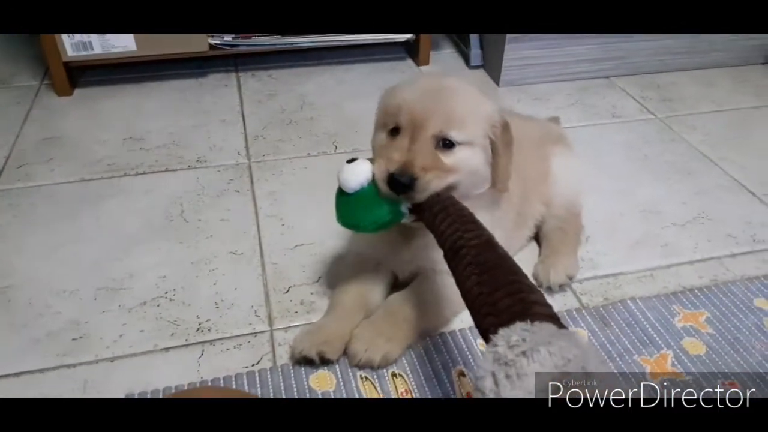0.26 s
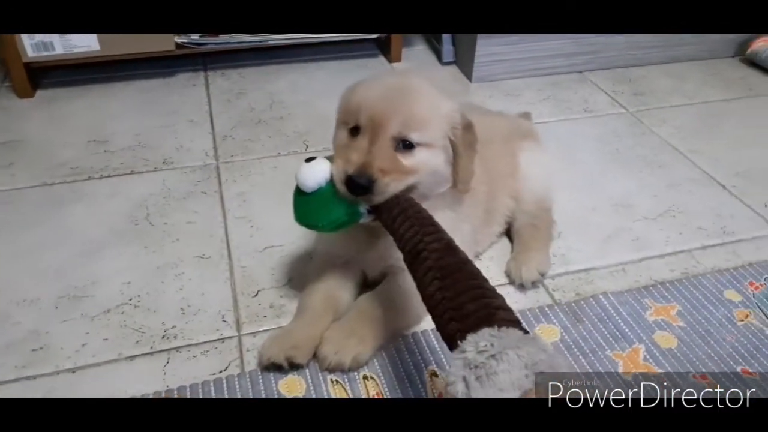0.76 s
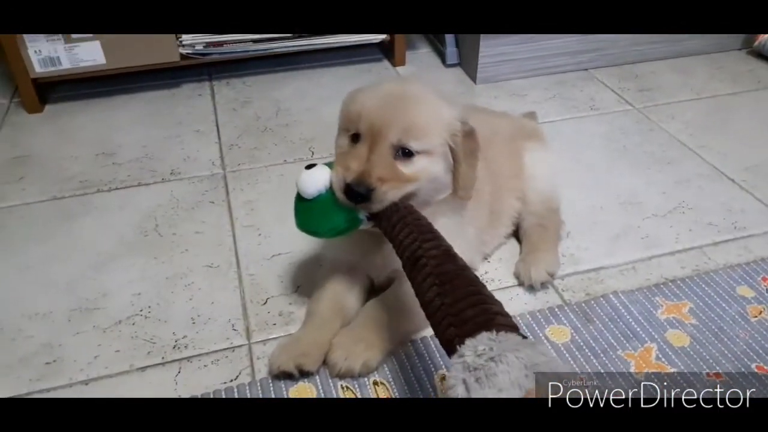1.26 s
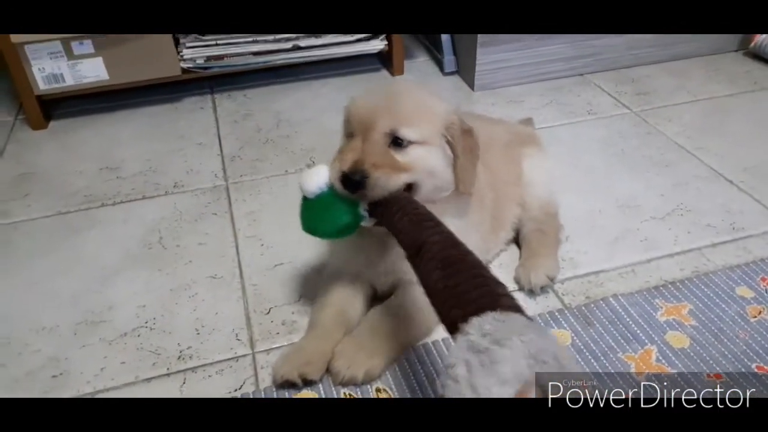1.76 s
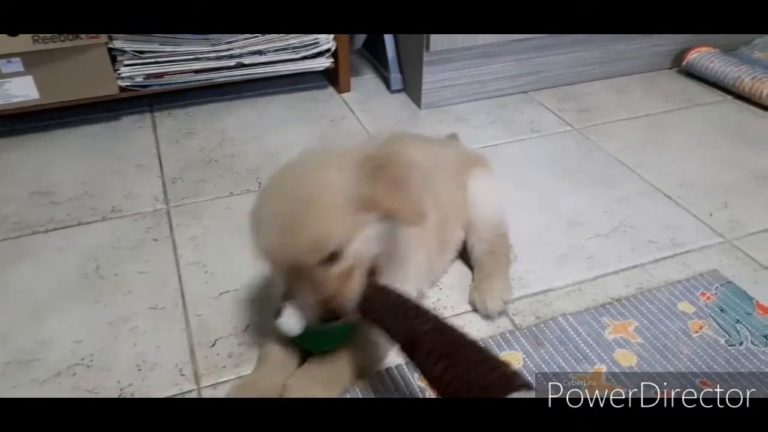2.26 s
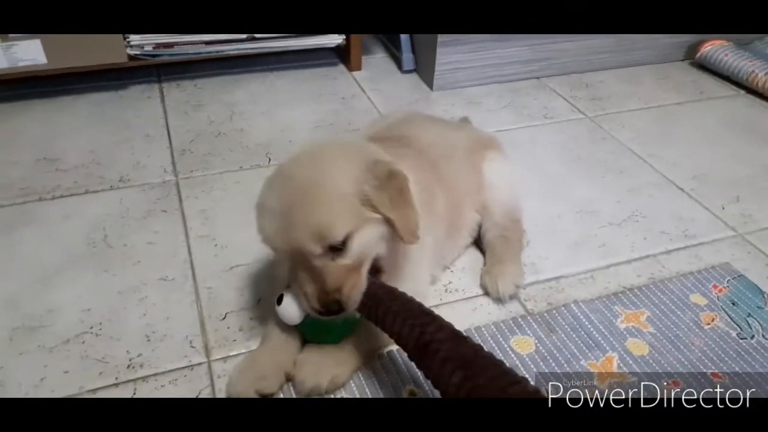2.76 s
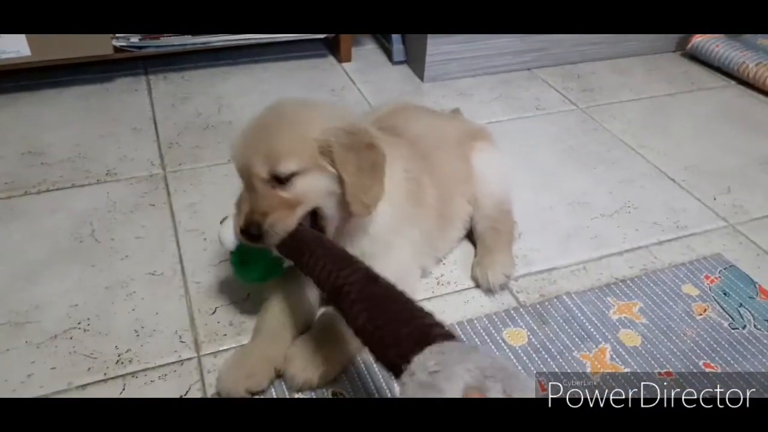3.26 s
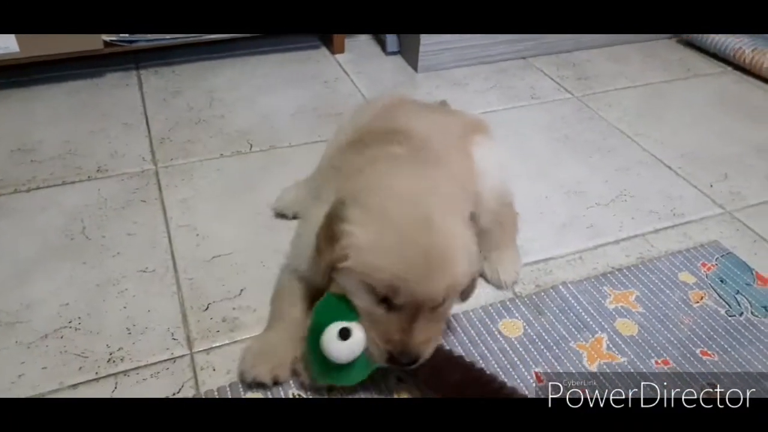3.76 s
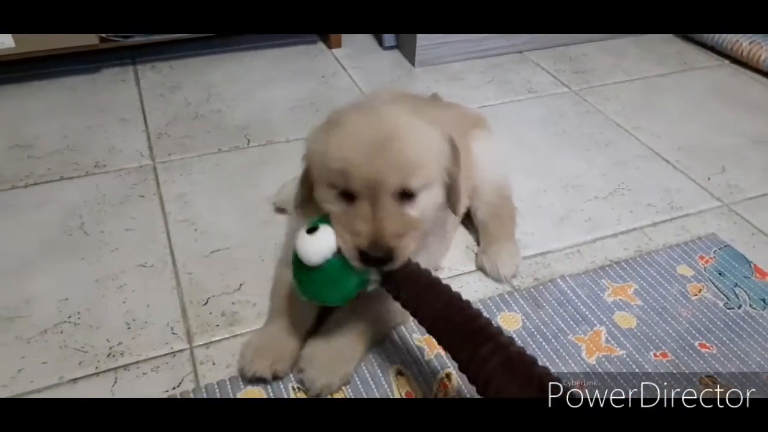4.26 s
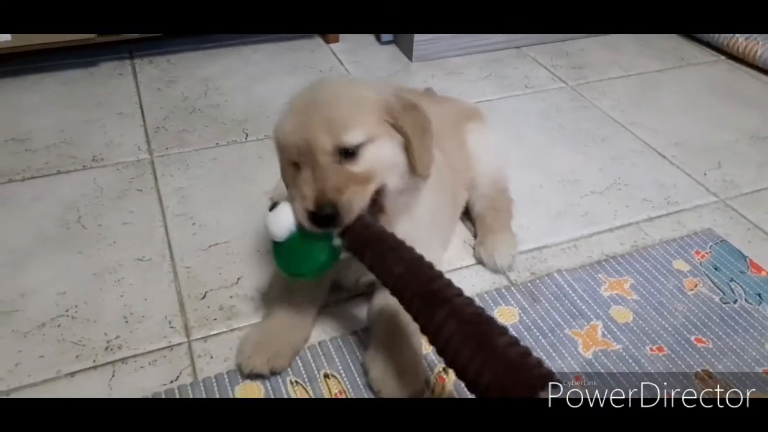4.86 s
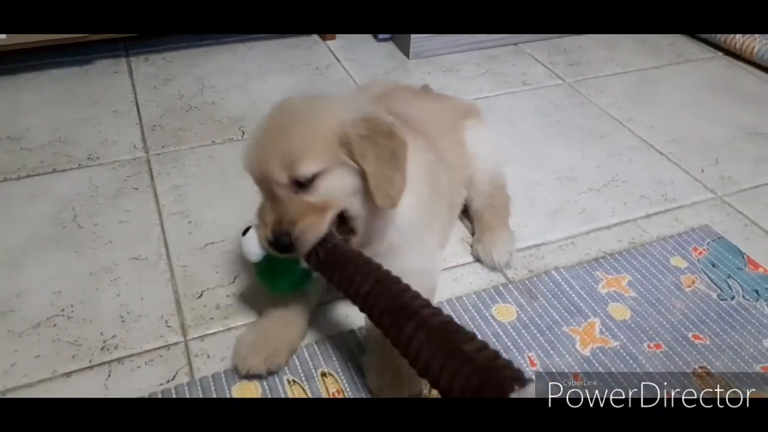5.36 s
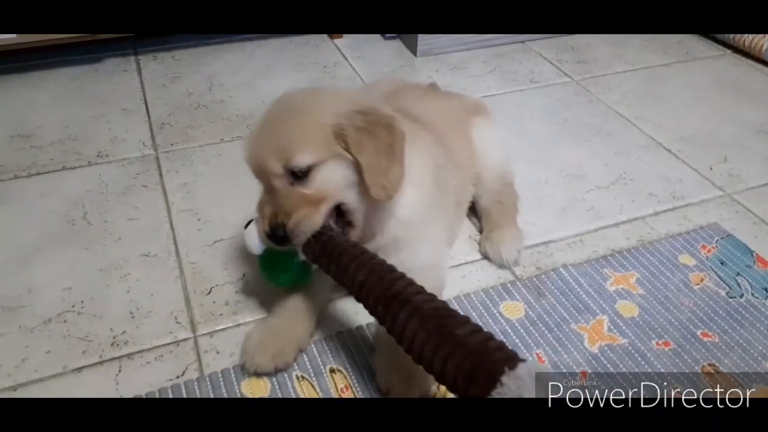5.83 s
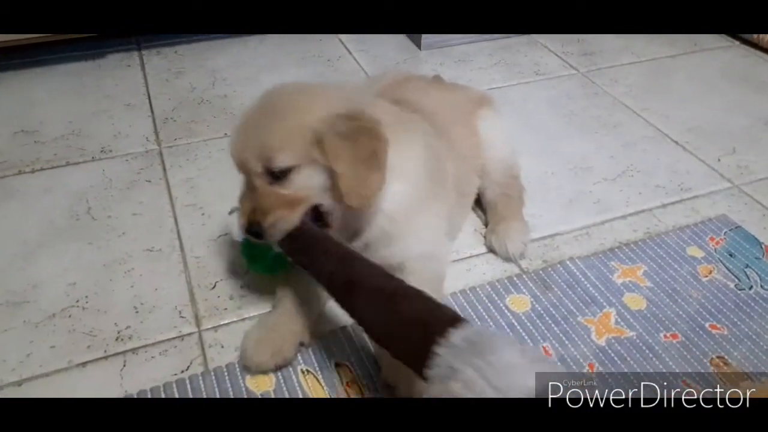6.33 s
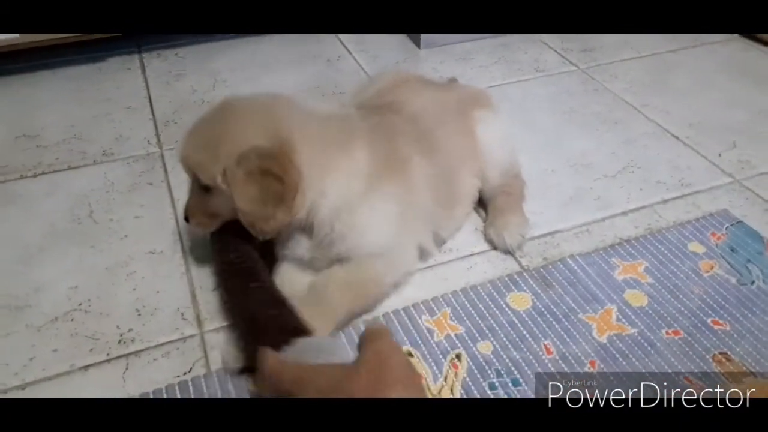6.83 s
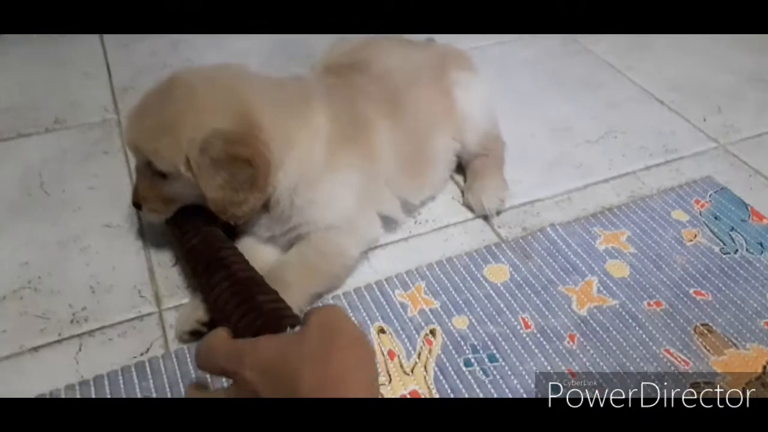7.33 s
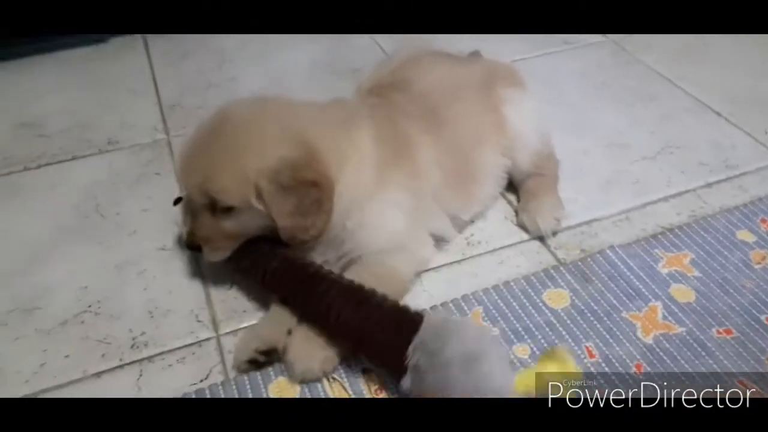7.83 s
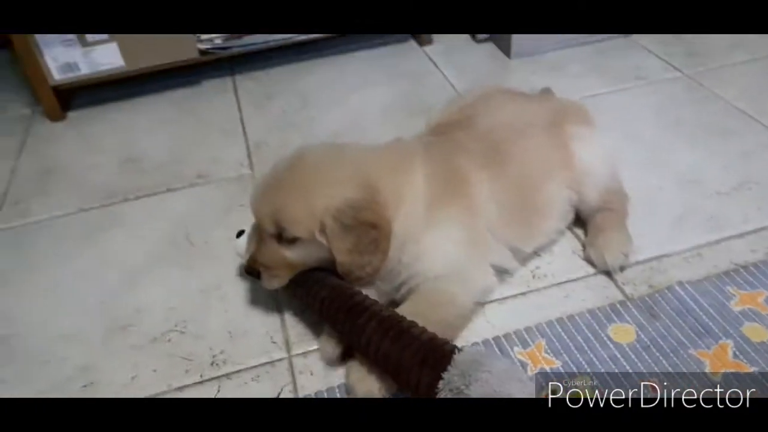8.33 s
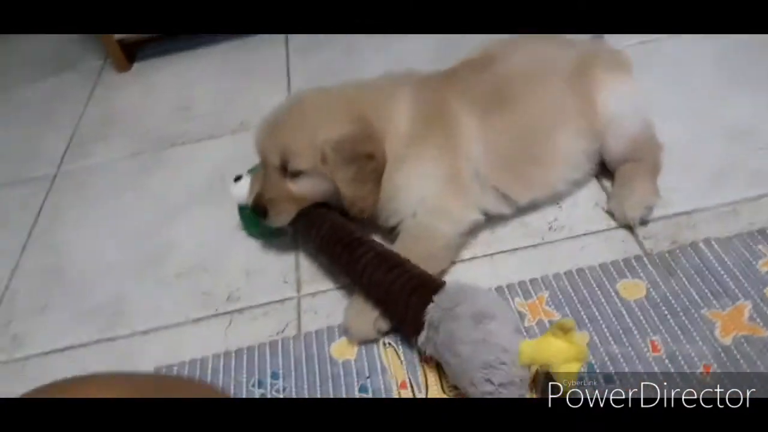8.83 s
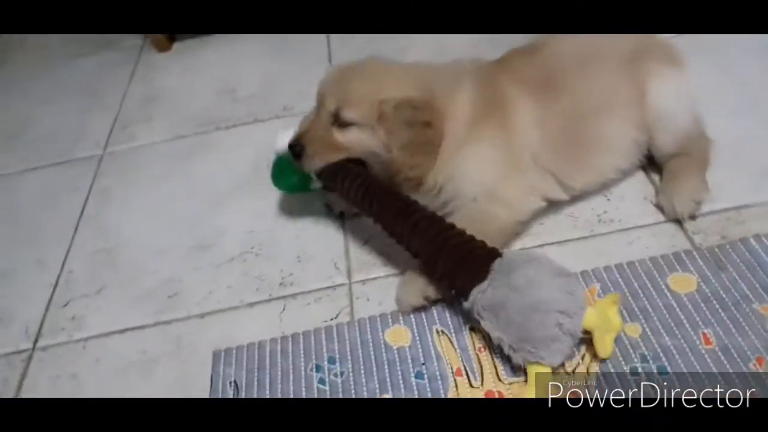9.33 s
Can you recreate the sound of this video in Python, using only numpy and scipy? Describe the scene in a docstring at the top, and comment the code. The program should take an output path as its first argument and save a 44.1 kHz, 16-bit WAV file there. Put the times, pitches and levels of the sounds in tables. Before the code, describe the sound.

Close to the microphone in a hard tiled room, a puppy bites a plush squeaky toy. Each bite makes a very short, bright arched squeak, followed by a quieter, lower, raspy squawk as it refills. Four quick pairs come first, then a gap with soft floor knocks, then five slower pairs. After that, only a steady low motor hum with fan air, fabric scuffs and a late dull thump remain.

```python
"""First the hum and air of appliances, with the room's tail of a squawk, heard close by on a tiled floor.
A puppy chews a plush toy beside a phone's two microphone ports. Each bite blows air out through the
squeaker's reed (a bright arched squeak); as the jaw lets go the bulb refills (a lower, raspy squawk).
Reeds are summed harmonics plus air noise in a short room; motors are beating tones, the fan is shaped
noise, plush is swelling noise, and soft knocks on the floor are fading low sines."""
import sys
import numpy as np
from scipy import signal
from scipy.fft import rfft, irfft, next_fast_len
from scipy.io import wavfile
from scipy.ndimage import map_coordinates

SR = 44100
rng = np.random.default_rng(int(sys.argv[2]) if len(sys.argv) > 2 else 0)


def store_pcm(level_fs):
    """Save levels as 16-bit WAV."""
    pcm = np.round(np.clip(level_fs, -1, 1) * 32767).astype(np.int16)
    wavfile.write(sys.argv[1], SR, np.atleast_2d(pcm).T)


N = 422919


def amp(db):
    """Decibels to gain."""
    return 10 ** (np.asarray(db) / 20)


def unit(x):
    """Scale to rms 1."""
    return x / np.sqrt(np.mean(x ** 2) + 1e-20)


def along(points, hz):
    """Read a curve of (f/Hz, value) points on a log frequency axis."""
    f, v = np.transpose(points)
    return np.interp(np.log(hz + 1), np.log(f + 1), v)


def curve(rows):
    """Turn (t/s, value) rows into one value per sample."""
    return np.interp(np.arange(N) / SR, *np.transpose(rows))


def wobble(rate, size):
    """A smooth random curve through rate knots a second."""
    knots = rng.standard_normal(size + 4)
    return map_coordinates(knots, [np.arange(size) * min(rate / SR, 1)])


def filtered(x, response):
    """Shape a sound's spectrum by a response of frequency."""
    n = x.shape[-1]
    m = next_fast_len(n + 8192)
    spectrum = rfft(x, m) * response(np.fft.rfftfreq(m, 1 / SR))
    return irfft(spectrum, m)[..., :n]


def add(track, s, sound):
    """Mix a sound in at time s, dropping what falls outside the track."""
    start = round(s * SR)
    part = sound[..., max(-start, 0):N - start]
    first = max(start, 0)
    track[..., first:first + part.shape[-1]] += part


def rush(colour):
    """Stereo noise of rms 1, alike at both ports in the bass and unrelated in the treble."""
    # likeness of the two ports: f/Hz, left-right correlation
    port_likeness = [(60, 0.95), (150, 0.9), (380, 0.56), (950, 0.087), (2380, -0.12), (5980, 0.036),
                     (15000, -0.012)]

    def mid_and_side(hz):
        turn = np.arccos(np.clip(along(port_likeness, hz), -1, 1)) / 2
        return colour(hz) * np.array([np.cos(turn), np.sin(turn)])

    mid, side = filtered(rng.standard_normal((2, N)), mid_and_side)
    return unit(np.array([mid + side, mid - side]))


def lines(hz, orders, drift):
    """A steady machine tone with overtones and a slightly wandering phase (drift in radians)."""
    phase = 2 * np.pi * hz * np.arange(N) / SR + drift * wobble(1.405, N)
    return sum(amp(db) * np.sin(round(k) * phase) for k, db in orders)


def appliances():
    """Two motors a few Hz apart beat over mains hum and fan noise that rings in a cabinet; all swell together."""
    # overtones of each motor, relative levels: multiple of the base tone, level/dB
    motor_overtones = [(1, -39.5), (2, -57), (3, -59), (4, -65)]
    second_overtones = [(1, -48), (2, -66), (3, -64)]
    # overtones of the mains hum: multiple of the base tone, mean level/dB
    mains_overtones = [(1, -48), (2, -57.5), (3, -58), (4, -58), (7, -68.5)]
    # rise and fall of the hum, used about its mean: t/s, level/dB
    hum_level = [(0, -41), (0.4, -38), (1.7, -41), (2.8, -40), (3.35, -38), (4.6, -39), (5.1, -40.5),
                 (7.3, -40), (7.6, -37.5), (8.3, -37.5), (8.8, -36.5), (9.59, -36.5)]
    # colour of the fan's air, relative: f/Hz, level/dB per Hz
    fan_colour = [(20, -56), (30, -39), (48, -22.5), (70, -19), (130, -14), (170, -18.5), (260, -8.5),
                  (400, -10.5), (600, -15), (1300, -18), (2300, -19), (4000, -33.5), (9000, -36),
                  (10500, -40.5), (15500, -42)]
    # cabinet resonances, relative: f/Hz, width/Hz, level/dB
    resonances = [(341, 50, 17), (274, 8.3, -11)]
    motor_hz, second_motor_hz, mains_hz = 287.8, 294.1, 100.05
    motor_db, fan_db, cabinet_db = -41.5, -43.5, -48  # ahead of the swell and the stereo lean
    fan_follows, mains_follows = 0.6, 0.52  # share of the motors' swell in dB

    level_db = curve(hum_level)
    swell_db = level_db - np.mean(level_db)
    motors = lines(motor_hz, motor_overtones, drift=.1)
    motors = motors + lines(second_motor_hz, second_overtones, drift=.15)
    mains = lines(mains_hz, mains_overtones, drift=0.058)
    hum = amp(motor_db + swell_db) * unit(motors) + amp(mains_follows * swell_db) * mains

    def ringing(f):
        return sum(amp(db) / (1 + (2 * (f - hz) / width) ** 2) for hz, width, db in resonances)

    air = rush(lambda f: amp(along(fan_colour, f)))
    cabinet = rush(ringing)
    fan = amp(fan_follows * swell_db) * (amp(fan_db) * air + amp(cabinet_db) * cabinet)
    return (hum + fan) * amp([[-1.25], [1.25]])  # stronger at the right port


def plush():
    """Chewed fabric scuffs throughout; each tug over tile and mat swells and fades, with a bright swish."""
    # tugs: t/s at the fastest, time/s from there down to 1/e, scuff level/dB, swish level/dB
    tugs = [(3.4, 0.29, -55, -63), (4.5, .4, -61, -70), (7.52, 0.12, -60, -78), (8.128, 0.23, -59, -61),
            (8.42, 0.034, -52.5, -55), (8.532, .06, -59, -63), (8.74, .03, -56, -63),
            (8.91, 0.16, -50, -57.5), (9.188, 0.11, -47, -46.5), (9.54, .06, -58, -64)]
    # colour of scuffing, relative: f/Hz, level/dB per Hz
    scuff_colour = [(300, -14), (900, -23), (2200, 5.5), (3500, -2.5), (6000, -19.5), (9000, -27),
                    (12500, -8.5), (15000, -32)]
    # colour of fast sliding, relative: f/Hz, level/dB per Hz
    swish_colour = [(1000, -19), (3500, 9), (6000, 9.5), (9000, 5), (15000, -22)]
    chew_db = -68  # steady rustle, ahead of the catches
    tug_shape = 1.5  # 1 is a pointed swell, 2 a rounded one

    t = np.arange(N) / SR
    rub, slide = np.full(N, amp(chew_db)), np.zeros(N)
    for s, width, scuff_db, swish_db in tugs:
        speed = np.exp(-np.abs((t - s) / width) ** tug_shape)
        rub = rub + amp(scuff_db) * speed
        slide = slide + amp(swish_db) * speed
    catches = wobble(14, N) + wobble(70, N)  # the pile catches and lets go
    scuff = rub * amp(2.2 * catches) * rush(lambda f: amp(along(scuff_colour, f)))
    swish = slide * amp(0.54 * catches) * rush(lambda f: amp(along(swish_colour, f)))
    return (scuff + swish) * amp([[-1], [1]])  # stronger at the right port


def arch(u, first, top, last, crest, climb, sag):
    """Pitch follows the air pressure: it climbs, holds, then sags; higher powers flatten the top."""
    crest = np.clip(crest, .1, .9)
    before = np.clip(1 - u / crest, 0, 1)
    after = np.clip((u - crest) / (1 - crest), 0, 1)
    return top + (first - top) * before ** climb + (last - top) * after ** sag


def reed(pitch, colour, fundamental_db, tilt_db, mouth_hz, mouth_db, flutter, shimmer_db):
    """Harmonics of a beating reed; flutter unsettles its period from cycle to cycle."""
    n = len(pitch)
    k = np.arange(1, 17)[:, None]
    phase = 2 * np.pi * np.cumsum(pitch * (1 + flutter * wobble(1114, n))) / SR
    db = colour(k * pitch) + tilt_db * np.log2(k) + (k == 1) * fundamental_db
    octaves_off = np.log2(k * pitch / mouth_hz)
    db = db + mouth_db * np.exp(-(octaves_off / 0.17) ** 2)  # the mouth lifts or shades one band
    db = db + shimmer_db * np.array([wobble(73, n) for _ in k])  # jaw and plush shade the opening
    shift = rng.normal(0, 1, k.shape)  # the pipe delays each overtone differently
    audible = k * pitch < SR / 2
    return np.sum(amp(db) * audible * np.sin(k * phase + shift), axis=0)


def gate(t, length, attack, release):
    """The reed starts abruptly and stops as the pressure runs out (all times in s)."""
    opening = 1 - np.exp(-t / attack)
    closing = np.sin(np.pi / 2 * np.clip((length - t) / release, 0, 1))
    return opening * closing


def jet(size):
    """Turbulent air in the reed's slot: shaped noise of rms 1."""
    # colour of the jet, relative: f/Hz, level/dB per Hz
    jet_colour = [(300, -48), (900, -14), (2200, 17), (4000, 8), (8000, -2), (11500, 0), (13500, -11),
                  (15300, -12)]
    return unit(filtered(rng.standard_normal(size), lambda hz: amp(along(jet_colour, hz))))


def squawk(length, top, crest, db, fundamental_db, tilt_db, mouth_hz, mouth_db, width):
    """Inward air: a thin buzz, then the reed swings wide and its overtones turn raspy, then the buzz returns."""
    # the inward reed's colour through plush, small swing then wide swing: f/Hz, level/dB
    thin_colour = [(950, -11), (1900, -7), (2900, -12.5), (3900, -11.5), (5000, -20.5), (6000, -15.5),
                   (7600, -7.5), (8800, -4), (10000, -16.5), (13000, -24), (15000, -49)]
    wide_colour = [(1100, 1.5), (2200, 4), (3300, -4), (4400, -10.5), (6500, -8), (8500, -18.5),
                   (11000, -19.5), (13500, -33), (15300, -21)]
    start_hz, end_hz = 938, 985  # the arch ahead of the collapse
    rasp_from_hz, rasp_per_hz, least_rasp = 1010, .0036, .16  # harder suction is higher and raspier

    t = np.arange(SR // 8) / SR
    u = np.clip(t / length, 0, 1)
    collapse = .04 * np.exp(-(1 - u) * length / .004)  # the suction gives out
    pitch = (1 - collapse) * arch(u ** 2, start_hz, top, end_hz, crest ** 2, climb=1.514, sag=1.417)
    swing = np.clip(width, 0, 1) * np.exp(-((u - .57) / .27) ** 4)
    rough = max(least_rasp, rasp_per_hz * (top - rasp_from_hz))
    rasp = rough * (.3 + .5 * swing + .7 * u ** 2)
    colour = lambda hz: (1 - swing) * along(thin_colour, hz) + swing * along(wide_colour, hz)
    tone = reed(pitch, colour, fundamental_db, tilt_db, mouth_hz, mouth_db, .04 * rasp, shimmer_db=3.0)
    hiss = amp(-9) * rasp * jet(len(t))
    return amp(db) * gate(t, length, 0.0013, 0.0015) * (tone + hiss)


def squeak(length, top, crest, db, fundamental_db, tilt_db, mouth_hz, mouth_db, rough):
    """Outward air: a bright tone that scoops up, holds, and collapses as the bulb empties."""
    # the outward reed's colour through plush: f/Hz, level/dB
    outward_colour = [(1350, -1.5), (2700, 0), (4100, -2), (5500, -1), (6900, 2.5), (8200, 2), (9600, -7),
                      (11000, -14), (12400, -21), (13700, -31), (15000, -31)]
    start_hz, slow_hz_per_s, end_hz = 1483, 2490, 1284  # the bare arch; a slower bite starts lower
    collapse_per_hz = 0.00081  # the harder the bite, the further its pitch falls

    t = np.arange(SR // 8) / SR
    u = np.clip(t / length, 0, 1)
    scoop = .09 * np.exp(-t / .0028)  # the reed needs a few cycles to reach its pitch
    collapse = collapse_per_hz * max(top - end_hz, 0) * np.exp(-(1 - u) * length / .005)
    attack = .035 * length  # slower bites start more softly
    fray = rough * (.06 + 1.2 * u ** 8)
    slack = (2 * u - 1) ** 2  # low pressure at both ends: softer and duller
    colour = lambda hz: along(outward_colour, hz)
    bend = arch(u, start_hz - slow_hz_per_s * length, top, end_hz, crest, climb=1.85, sag=2.5)
    pitch = (1 - scoop - collapse) * bend
    tilt = tilt_db - .7 * slack
    tone = reed(pitch, colour, fundamental_db, tilt, mouth_hz, mouth_db, .04 * fray, shimmer_db=1.0)
    hiss = amp(-8.5) * (fray + .03 + scoop) * jet(len(t))
    return amp(db - 1.63 * slack) * gate(t, length, attack, 0.012) * (tone + hiss)


def in_room(sound, turn_db):
    """Direct sound at the near right and shaded left port, with a fresh noise tail for tile and walls."""
    # shading of the left port: f/Hz, level/dB
    far_port = [(1000, 3), (1400, -11.5), (2400, -21), (4200, -6), (5500, -10), (8000, -14), (15000, -9.5)]
    # how long the room rings: f/Hz, time/s to fall 60 dB
    ring_time = [(300, 1), (1200, 0.29), (3000, 0.34), (7000, 0.36), (14000, 0.18)]
    # level of the room's answer: f/Hz, level/dB
    echo_level = [(1000, -2.5), (2400, -8.5), (5000, -7), (8000, -11.5), (12000, -5.5), (15000, 2.5)]

    hz, t, z = signal.stft(rng.standard_normal((2, SR // 2)), SR, nperseg=256)
    decay = amp(-60 * t / along(ring_time, hz)[:, None])
    decay /= np.sqrt(np.sum(decay ** 2, axis=1, keepdims=True) * 128)  # equal energy in each band
    tail = signal.istft(z * decay * amp(along(echo_level, hz))[:, None], SR, nperseg=256)[1]
    tail *= 1 - np.exp(-np.arange(tail.shape[1]) / SR / 0.00097)  # the tail builds up in about 1 ms
    left, right = signal.fftconvolve(sound[None], tail, axes=1) * amp([[-1], [0]])
    direct = np.pad(sound, (0, len(right) - len(sound)))

    def path_to_left(f):
        delay = np.exp(-2j * np.pi * f * .00004)  # 40 microseconds further away
        return amp(along(far_port, f) + turn_db) * delay

    return np.array([left + filtered(direct, path_to_left), right + direct])


def squeaker():
    """Every refill blows the reed inward and every bite blows it outward, each heard in the room."""
    # bites: t/s, length/s, top of the arch f/Hz, place of the top (share of length), level/dB,
    # fundamental/dB, tilt/dB per octave, mouth band f/Hz, mouth band level/dB,
    # roughness 0-1, turn towards the left port level/dB
    bites = [(.198, 0.067, 1364, .57, -20, -0.5, -0.36, 4140, 0, 0.42, 3),
             (.628, .063, 1365, 0.4, -20, 0.5, 0.45, 4100, 1.5, 0.46, 0),
             (1.087, 0.059, 1432, 0.75, -17, -1, 0.1, 6040, 4.5, .1, 2.5),
             (1.818, 0.055, 1395, .38, -18.5, -1, -0.0033, 4150, -1.5, 1, 1.5),
             (3.373, 0.092, 1324, 0.44, -20, 0.5, .3, 2650, 0, 0.15, -1.5),
             (4.212, 0.083, 1359, 0.28, -18.5, -8, -1.3, 2980, 4.5, 0.94, -7),
             (4.873, 0.075, 1453, 0.494, -15.5, -3.5, -0.69, 4350, 4.5, 0.092, -1),
             (5.471, 0.077, 1377, 0.49, -21, -2.5, -0.022, 4020, 5, .1, 0),
             (6.049, .082, 1382, 0.41, -20.5, -1, 0.19, 5330, -1, 0.54, -2)]
    # refills of the bulb: same columns, with the width of the reed's swing 0-1 in place of roughness
    refills = [(-.055, 0.055, 1176, 0.73, -28.5, 1.5, -.1, 2300, 3.5, 0.76, -3),
               (.363, 0.053, 1189, 0.63, -23.5, 6, 0.8, 2320, 1.5, 0.77, -0.5),
               (.793, 0.059, 1140, 0.63, -23, 3, 0.94, 3440, -0.5, 0.73, 0.5),
               (1.261, 0.06, 1198, .66, -23.5, 5.5, 0.79, 3950, .5, 0.73, -0.5),
               (1.988, .056, 1200, 0.76, -23, 1.5, 0.27, 3400, -1.5, 0.62, -5),
               (2.652, 0.0096, 862, .26, -28, -5, -0.48, 1750, 3, 0.43, -2),
               (3.704, .051, 1096, .58, -22, -2.5, -0.62, 3100, 0.5, 0.89, -5),
               (4.389, .07, 1088, 0.53, -20.5, -4, -.5, 3160, -1.5, 0.85, -6),
               (5.143, 0.09, 1053, 0.55, -21.5, -3.5, -0.43, 4200, 4, 0.71, -4),
               (5.666, 0.083, 1040, 0.66, -21, -1, -0.68, 3800, 5, 0.51, -8),
               (6.245, .079, 1092, .7, -23.5, 1.5, 0.34, 3530, 8, 0.52, -4.5)]
    out = np.zeros((2, N))
    for table, voice in (refills, squawk), (bites, squeak):
        for s, *blow, turn_db in table:
            add(out, s, in_room(voice(*blow), turn_db))
    return out


def bumps():
    """Soft, low knocks of paws and toy on the floor: sines that fade by 60 dB in 0.1 s."""
    # knocks: t/s, level/dB ahead of the fade, f/Hz
    knocks = [(2.77, -37, 80), (2.88, -44, 60), (3.028, -34, 113), (3.149, -32, 108), (3.46, -43, 50),
              (6.199, -37, 137), (9.119, -30, 73)]
    out, t = np.zeros(N), np.arange(SR // 4) / SR
    for s, db, hz in knocks:
        onset = (1 - np.exp(-t / 0.0039)) ** 2
        add(out, s, amp(db - 60 * t / 0.1) * onset * np.sin(2 * np.pi * hz * t))
    return out


def scene():
    """The toy close by, over the quiet room."""
    return appliances() + plush() + squeaker() + bumps()


def record(dry):
    """The phone keeps nothing from its band limit of 15600 Hz upward."""
    return filtered(dry, lambda hz: hz < 15600)


dry = scene()
out = record(dry)
store_pcm(out)
```